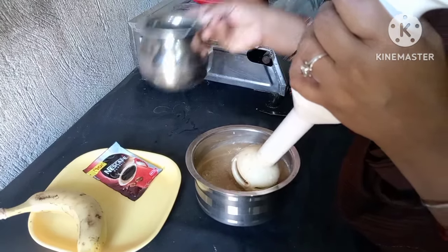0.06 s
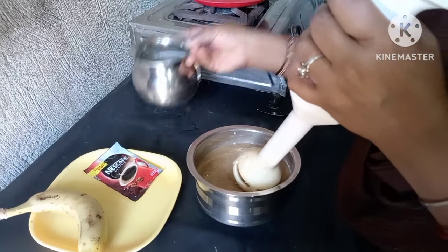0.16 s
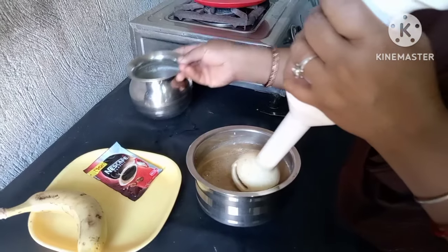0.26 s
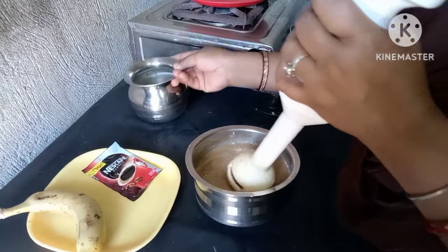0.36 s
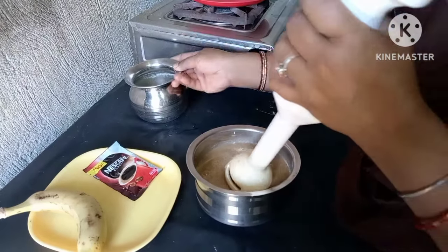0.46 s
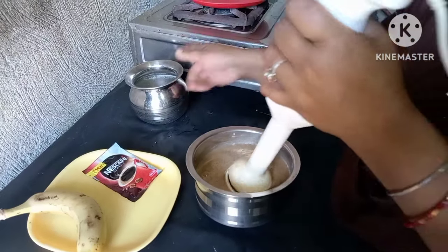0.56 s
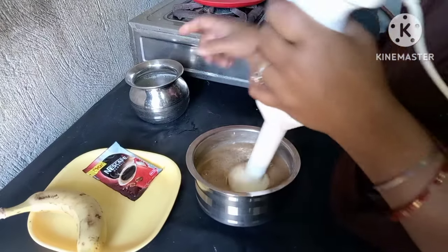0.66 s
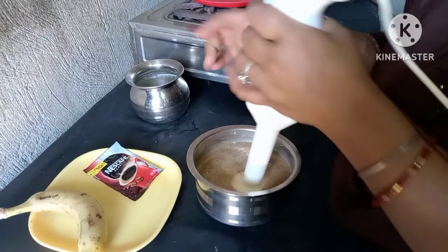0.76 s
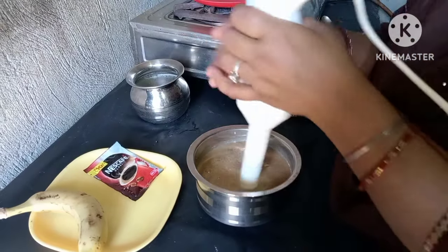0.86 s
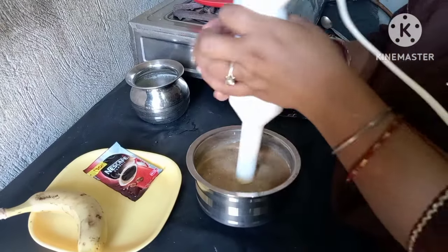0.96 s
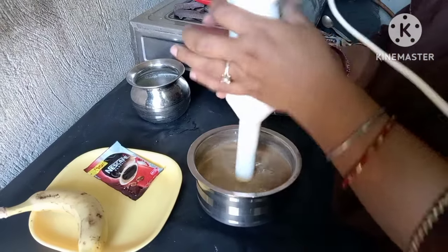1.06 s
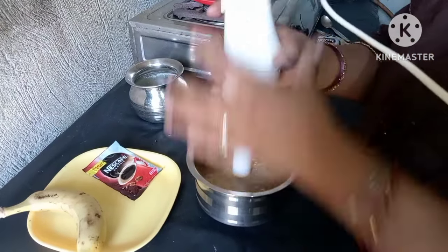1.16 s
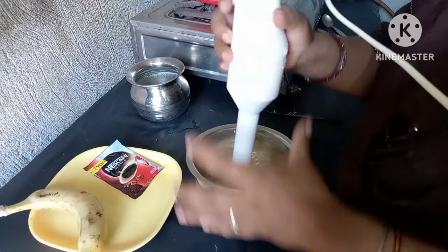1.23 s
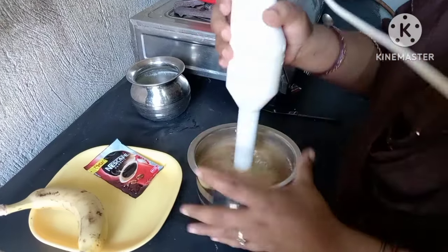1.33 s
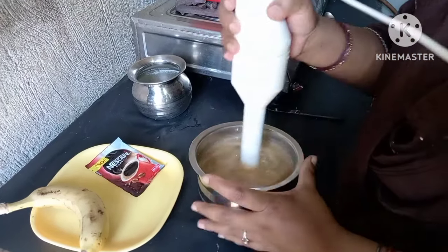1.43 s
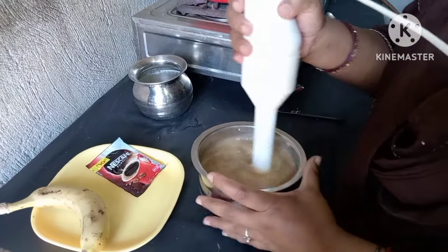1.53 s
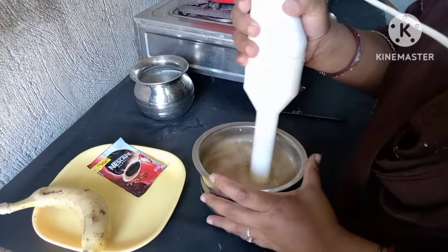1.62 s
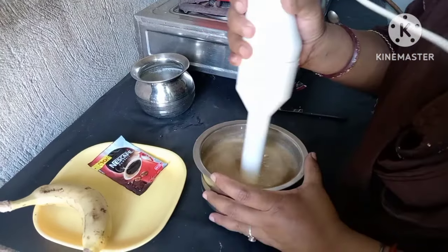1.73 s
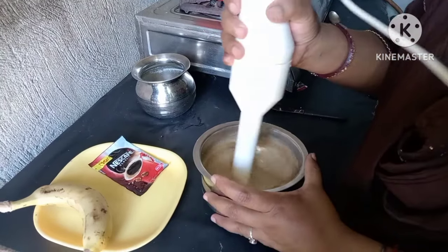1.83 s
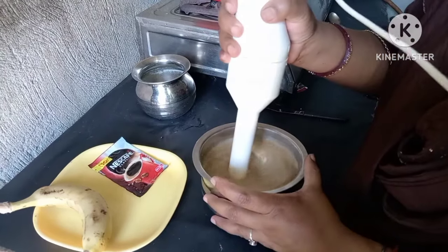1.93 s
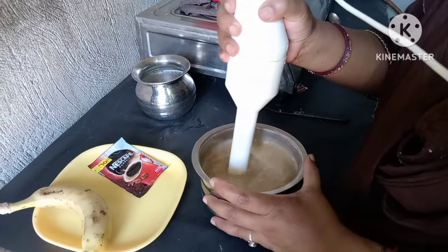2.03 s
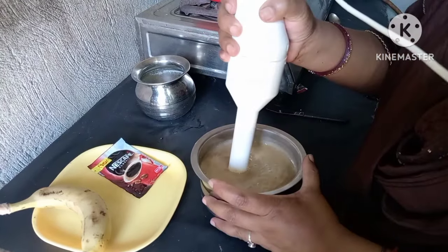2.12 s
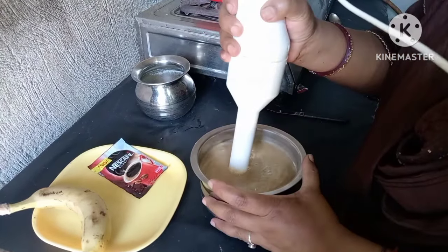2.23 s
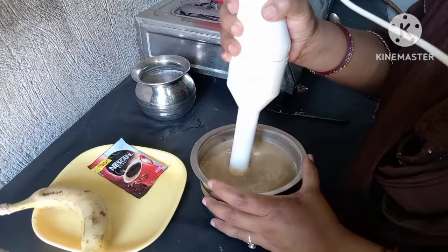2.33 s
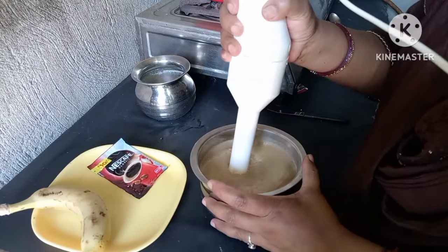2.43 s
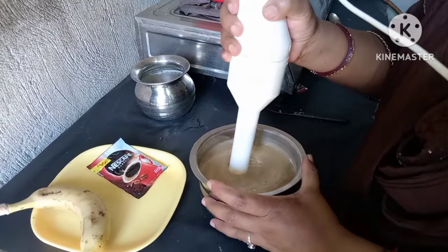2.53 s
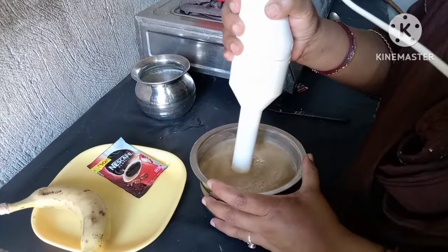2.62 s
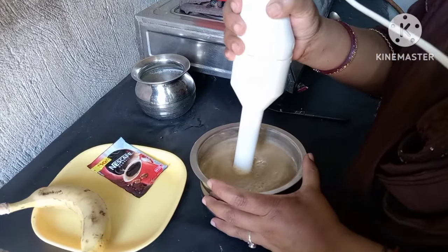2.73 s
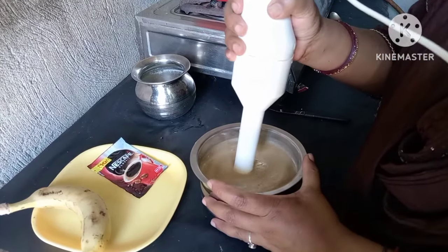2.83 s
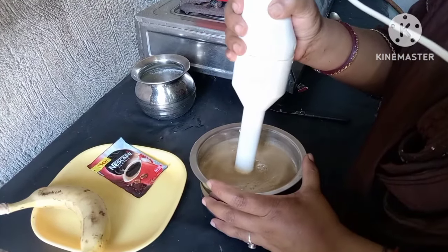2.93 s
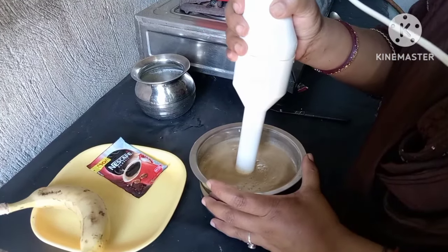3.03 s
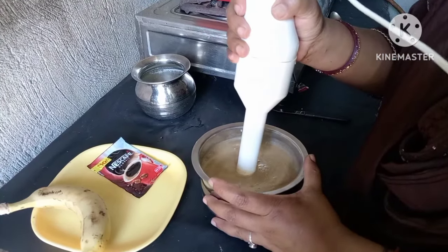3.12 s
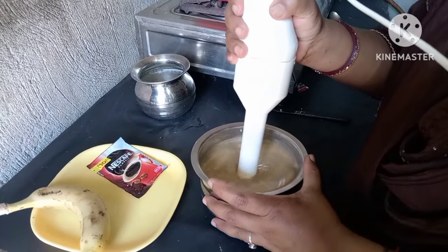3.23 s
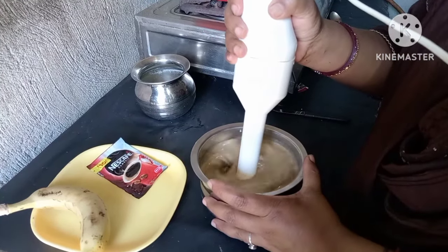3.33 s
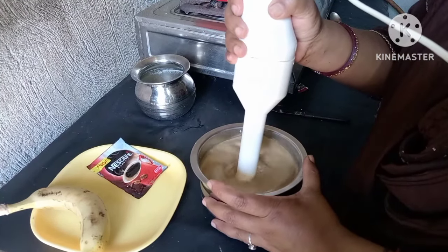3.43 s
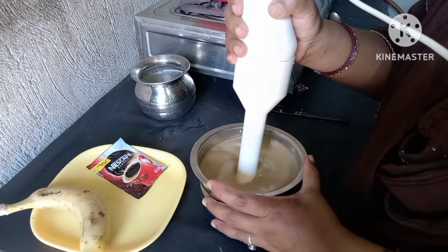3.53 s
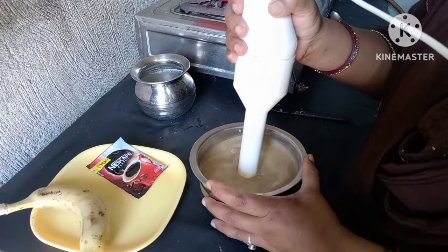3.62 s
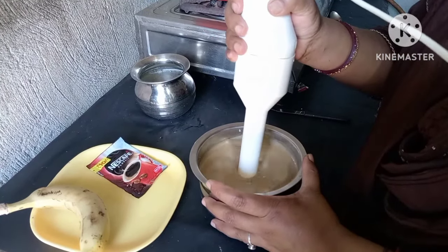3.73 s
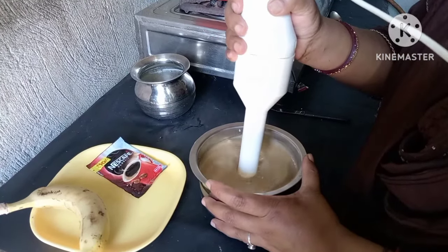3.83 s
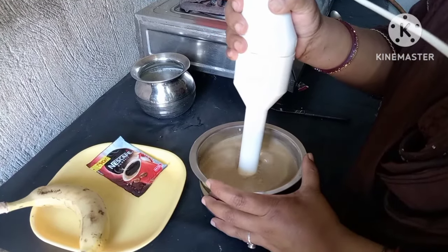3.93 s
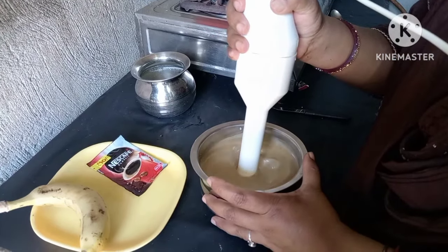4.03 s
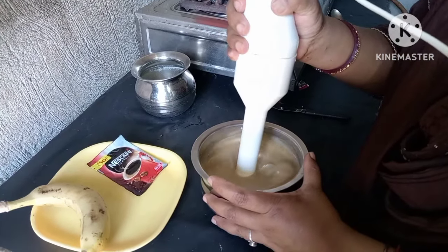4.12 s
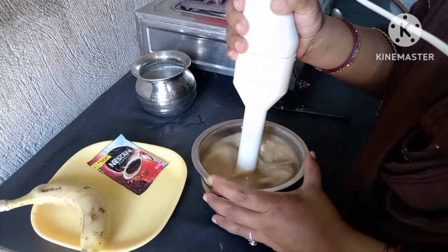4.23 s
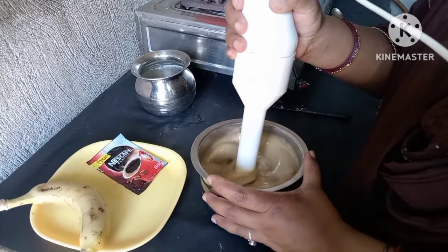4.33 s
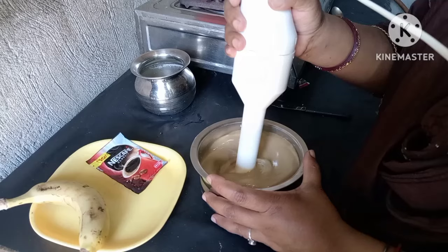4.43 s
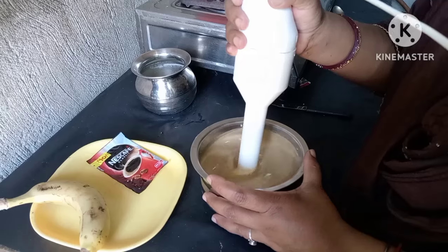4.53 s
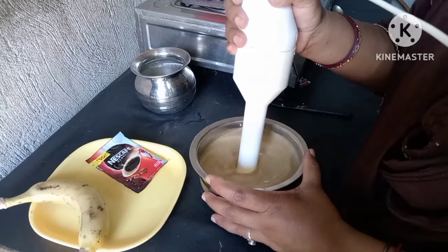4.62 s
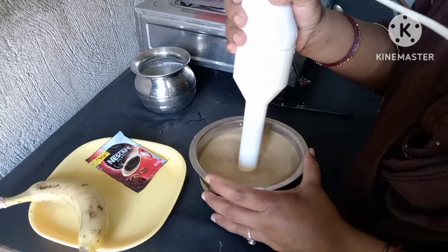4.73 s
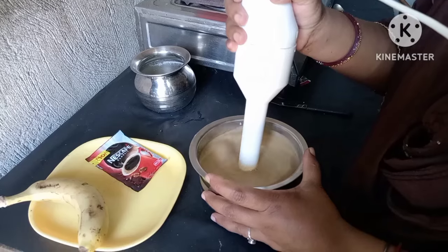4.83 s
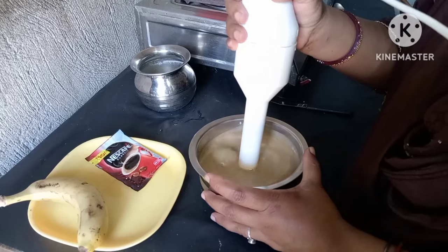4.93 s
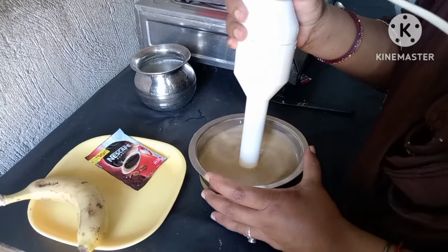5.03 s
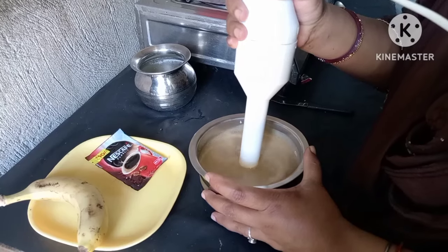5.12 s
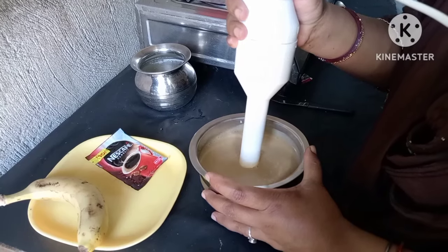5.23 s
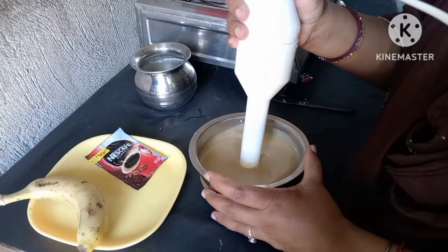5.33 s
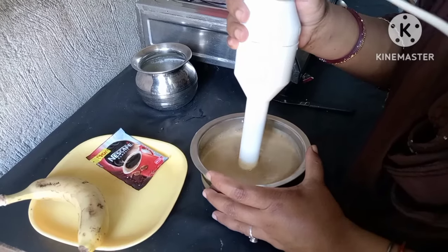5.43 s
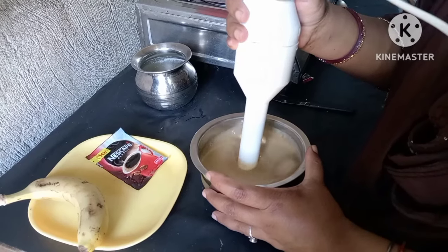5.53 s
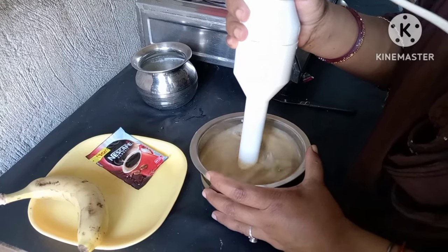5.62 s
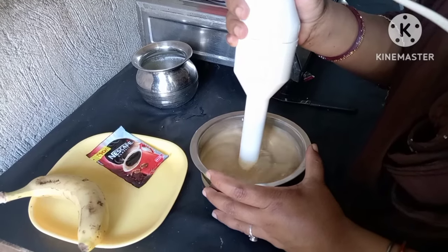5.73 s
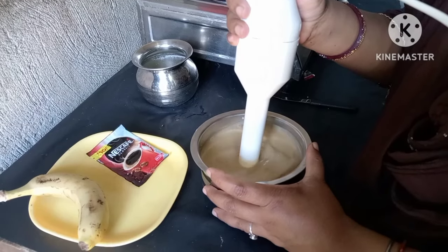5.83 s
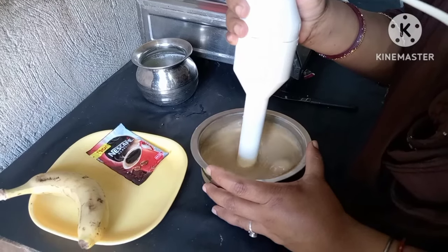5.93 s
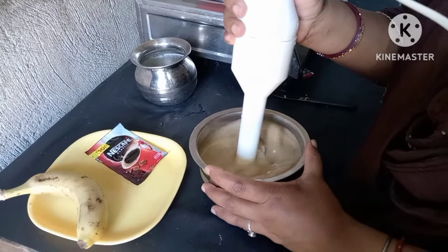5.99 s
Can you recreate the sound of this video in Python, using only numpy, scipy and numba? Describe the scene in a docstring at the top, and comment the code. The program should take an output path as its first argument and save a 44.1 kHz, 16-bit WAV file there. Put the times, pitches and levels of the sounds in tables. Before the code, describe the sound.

In a quiet, low-humming small kitchen, a metal jug is set down and a steel pot knocks and slides on a stone counter. After a near-silent pause, a hand blender fires four brief bursts into milky liquid: a click, a rising whirr, loud wet bubbling churn and a quick run-down. Big bubbles glug softly between the second and third. Close microphone, slightly muffled treble, short hard room tail on the knocks.

```python
"""Over a quiet kitchen hum, the pot and a jug are knocked and slid on a stone counter: decaying tones and noise.
A hand blender then pulses four times in a steel pot of milk and fruit, close to the microphone.
Its churn is made of bursting bubbles, hiss and blade blows; trapped air pockets are ringing, gliding tones.
Big bubbles glug in between, as notes that climb a little. A small hard room adds a short tail to the knocks."""
import sys
import numpy as np
from scipy import signal
from scipy.fft import rfft, irfft, next_fast_len
from scipy.io import wavfile
from scipy.ndimage import uniform_filter1d
from numba import njit

SR = 44100
rng = np.random.default_rng(int(sys.argv[2]) if len(sys.argv) > 2 else 0)


def transcribe(signal):
    """Save signal, clipped to [-1, 1], as a 16-bit WAV file at the path in sys.argv[1]."""
    frames = np.atleast_2d(signal).T
    limited = np.clip(frames, -1, 1)
    pcm = np.round(limited * 32767).astype(np.int16)
    wavfile.write(sys.argv[1], SR, pcm)


N = 267157
T = np.arange(N) / SR  # time of every sample, s


def undb(db):
    """Turn a level in dB into a gain."""
    return 10 ** (np.asarray(db) / 20)


def unit(x):
    """Scale to an rms of 1."""
    return x / np.sqrt(np.mean(x ** 2))


def colour(x, table):
    """Shape the spectrum through (f/Hz, level/dB) points joined on a log-frequency axis."""
    hz, db = np.transpose(table)
    size = next_fast_len(N)
    log_f = np.log(np.arange(size // 2 + 1) * SR / size + 1)
    gain = undb(np.interp(log_f, np.log(hz + 1), db))
    return irfft(rfft(x, size) * gain, size)[..., :N]


def band(x, lo_hz, hi_hz):
    """Keep the sound between two frequencies."""
    return signal.sosfilt(signal.butter(2, [lo_hz, hi_hz], "band", fs=SR, output="sos"), x)


def resonate(x, peaks):
    """Add up resonances, each given as (f/Hz, width/Hz, level/dB)."""
    return sum(undb(db) * signal.lfilter(*signal.iirpeak(hz, hz / width, SR), x) for hz, width, db in peaks)


def walk(rate):
    """Random levels with a spread near 1, each held for 1 / rate seconds and then smoothed twice."""
    hold = int(SR / rate)
    steps = np.repeat(rng.standard_normal(N // hold + 1), hold)
    return 1.3 * uniform_filter1d(uniform_filter1d(steps, hold), hold)[:N]


def add(out, s, x):
    """Mix x into out, starting at time s."""
    i = int(s * SR)
    out[..., i:i + x.shape[-1]] += x[..., :N - i]


def ring(modes, stretch, detune, luck_db=4.5):
    """A struck body as decaying sines with a joint peak of 1; every blow weights and tunes them anew."""
    t = np.arange(SR // 2) / SR
    luck = rng.standard_normal((len(modes), 2))
    x = 0
    for (hz, db, t60), (louder, sharper) in zip(modes, luck):
        sine = np.sin(2 * np.pi * hz * (1 + detune * sharper) * t)
        x = x + undb(db + luck_db * louder) * sine * undb(-60 * t / (t60 * stretch))
    return x / np.abs(x).max()


START_S, BITE_S = .004, 0.017  # time to catch, time to take the load
SPIN_SHAPE = 0.78  # under 1: the level climbs fastest just after the catch
# the first load is loudest, then the vortex settles
SURGE_DB, SURGE_RISE_S, SURGE_S = 5.5, 0.023, 0.08
# splash, spray and rumble against the churn (dB), before each press shifts the first two
FREE_DB, LOADED_DB = (-0.5, -3.5, -17), (-10, -17.5, -20)  # while spinning up, while running
CATCH_DB, CATCH_S = -18, .016  # the treble is weak as the motor catches, and arrives this soon
# after the bite, liquid is thrown up: part way back to the brightness of the spin-up, then calm
THROW_S, THROW_SHARE, SETTLE_S = .028, 0.6, 0.066
OPEN_DB_PER_S = 12  # the treble opens while the blade runs and whips air in
DARKEN_DB = (-1, -6)  # splash and spray fade further once the blade has stalled
STALLED_RUMBLE_DB = 1.5  # the rumble against the churn soon after the stall
# presses of the button: switch on t/s, blade bites t/s, switch off t/s, blade stalls t/s,
# level/dB as the motor catches, just before the bite, and running before the surge;
# fall while coasting and while dying out (dB per s); treble shift/dB spinning up, and running;
# splash, spray and rumble at the stall (level/dB against the churn)
BUTTON_PRESSES = [(3.08, 3.148, 3.253, 3.44, -47, -18, -14.5, -108, -250, -1, -2, -8, -18.5, -14),
                  (3.924, 3.955, 4.327, 4.58, -60, -35.5, -16.5, -108, -350, 1, -1.4, -4.5, -13, -4),
                  (5.312, 5.353, 5.462, 5.62, -50.5, -21, -16, -125, -160, -7, 0, -6.5, -14, -7.5),
                  (5.747, 5.802, 6.086, 6.225, -44, -20, -17, -110, -200, -8.5, -0.61, -4, -18, -8)]


def press(on, bite, off, stall, catch_db, free_db, run_db, coast_db, die_db, up_db, open_db, *stalled_db):
    """One press as four gains (churn, splash, spray, rumble): catch, spin up, bite, run, coast, stall."""
    db = np.interp(T, [on - START_S, on, bite, bite + BITE_S], [-90, catch_db, free_db, run_db])
    spin = np.clip((T - on) / (bite - on), 0, 1)
    db += (free_db - catch_db) * (spin ** SPIN_SHAPE - spin)
    after = np.clip(T - bite, 0, None)
    db += SURGE_DB * (1 - np.exp(-after / SURGE_RISE_S)) * np.exp(-after / SURGE_S)
    db += coast_db * np.clip(T - off, 0, stall - off)
    db += die_db * np.clip(T - stall, 0, None)

    times = [on, on + CATCH_S, bite, bite + BITE_S, bite + THROW_S, bite + SETTLE_S, off, stall, stall + 0.11]
    end_db = (*np.add(stalled_db[:2], DARKEN_DB), STALLED_RUMBLE_DB)
    is_treble = (1, 1, 0)
    parts = []
    for free, loaded, stalled, end, treble in zip(FREE_DB, LOADED_DB, stalled_db, end_db, is_treble):
        free = free + treble * up_db
        loaded = loaded + treble * open_db
        caught = free + treble * CATCH_DB
        bitten = free + free_db - run_db  # undoes the change of the churn level
        thrown = loaded + THROW_SHARE * (free - loaded)
        opened = loaded + treble * OPEN_DB_PER_S * (off - bite)
        levels = [caught, free, free, bitten, thrown, loaded, opened, stalled, end]
        parts.append(np.interp(T, times, levels))
    return undb(db + np.array([0 * T, *parts])) * (T > on - START_S)


@njit
def bubbles(start, hz, cycles, size, glide, n):
    """Each bubble is a sine that dies in a few cycles while its pitch climbs."""
    out = np.zeros(n)
    for k in range(len(start)):
        step = np.exp((2j * np.pi - 3 / cycles[k]) * hz[k] / SR)
        climb = np.exp(2j * np.pi * glide * (hz[k] / SR) ** 2 / cycles[k])
        z = size[k] + 0j
        for i in range(start[k], min(n, start[k] + int(2 * cycles[k] * SR / hz[k]))):
            out[i] += z.imag
            z *= step
            step *= climb
    return out


def froth(per_s, scatter_db):
    """Dense bubbles of all sizes, most bursting at once, some ringing long, over a bed of hiss."""
    u = rng.random((int(per_s * N / SR), 4)).T
    hz = 250 * 30 ** u[1]
    cycles = 2 + 30.0 * u[2] ** 3.0
    size = undb(-scatter_db * np.log(u[3] + 0.0066)) * hz / cycles ** 0.44
    pops = bubbles((u[0] * N).astype(np.int64), hz, cycles, size, .15, N)
    return unit(pops) + undb(7.5) * rng.standard_normal(N)


def chops(per_s, scatter_db):
    """The blade hits fruit and air at uneven moments: short dull blows."""
    u = rng.random((int(per_s * N / SR), 3)).T
    start = np.cumsum(.5 + u[0]) * SR / per_s
    cycles = 3 + 0 * start
    return unit(bubbles(start.astype(np.int64), 550 + 500 * u[1], cycles, undb(scatter_db * u[2]), 0.19, N))


# spectrum of the churning liquid: f/Hz, relative level/dB (per Hz)
CHURN_SPECTRUM = [(150, -45.5), (250, -11.5), (309, -17.5), (341, -6), (377, -9.5), (440, -7.5),
                  (644, -5.5), (831, -6.5), (1150, -7.5), (1460, -10), (2020, -11), (5600, -29),
                  (7320, -44.5), (9520, -69), (16100, -120)]
# resonances of the blender housing: f/Hz, width/Hz, level/dB
HOUSING = [(950, 91, -11), (1270, 120, -8), (2040, 120, -11.5), (2950, 120, -6.5), (3920, 360, -1.5),
           (6030, 720, -2.5)]


def churn():
    """Blade noise: froth, chops, splash, spray and rumble, the parts throbbing on their own."""
    level, splash_gain, spray_gain, rumble_gain = sum(press(*one) for one in BUTTON_PRESSES)
    raw = colour(froth(2500, 1.3), CHURN_SPECTRUM)
    raw = raw + resonate(raw, HOUSING)
    low = colour(raw, [(2000, 0), (3200, -20), (4000, -60)])
    top = colour(raw, [(3000, -60), (3900, -20), (5400, 0)])
    middle = raw - low - top
    splash = splash_gain * unit(middle) * undb(0.59 * walk(30))
    spray = spray_gain * unit(top) * undb(2.4 * walk(33))
    deep = band(band(rng.standard_normal(N), 108, 280), 108, 280)
    rumble = rumble_gain * unit(deep) * undb(1.4 * walk(27))
    body = unit(low) * undb(1.7 * walk(40))
    blows = undb(-9.5) * band(chops(90, 5), 200, 6000)
    return level * (body + blows) + splash + spray + rumble


POCKET_EDGE_DB, POCKET_SHAPE = -19, 1.2  # drop towards start and end; roundness of the swell
# air pockets ringing under the blade: start t/s, peak t/s, end t/s, pitch at the peak f/Hz,
# glide (octaves per s), rms level/dB at the peak before flutter
AIR_POCKETS = [(3.13, 3.17, 3.23, 739, 6, -13.5), (3.19, 3.24, 3.36, 790, -2, -22.5),
               (3.76, 3.83, 3.95, 595, .1, -65), (4.7, 4.75, 4.86, 538, -1, -65.5),
               (3.95, 4.0, 4.04, 920, -4, -23.5), (3.99, 4.06, 4.21, 639, -5.5, -15),
               (3.97, 4.015, 4.06, 290, 2.5, -25.5), (4.06, 4.165, 4.2, 348, 0.9, -18),
               (4.05, 4.125, 4.2, 710, -1.7, -17), (4.18, 4.208, 4.25, 1120, 0.5, -19.5),
               (4.25, 4.3, 4.37, 1090, -2, -21.5), (4.23, 4.31, 4.46, 400, -0.7, -21.5),
               (5.345, 5.39, 5.43, 830, -5, -17), (5.345, 5.37, 5.43, 990, -1, -19),
               (5.35, 5.43, 5.48, 660, -2, -13.5), (5.38, 5.41, 5.49, 495, -2.5, -16.5),
               (5.4, 5.43, 5.48, 300, 0.5, -18), (5.45, 5.495, 5.6, 312, 1.5, -23.5),
               (5.86, 5.915, 5.98, 340, 0.2, -7), (5.79, 5.85, 5.9, 340, 1.5, -21),
               (5.93, 5.99, 6.1, 350, -0.4, -19.5), (5.83, 5.87, 5.9, 1200, -2, -26),
               (5.47, 5.53, 5.6, 400, 0.5, -28.5), (3.15, 3.2, 3.3, 480, -1.5, -25.5),
               (3.13, 3.18, 3.33, 140, 0, -29.5)]


def pockets():
    """Air pockets: tones that glide as the pocket grows or shrinks; the higher ones stutter more."""
    out = np.zeros(N)
    for start, peak, end, hz, glide, db in AIR_POCKETS:
        away = np.interp(T, [start, peak, end], [1, 0, 1])
        pitch = hz * 2 ** (glide * (np.clip(T, start, end) - peak))
        stutter_db = 5.5 * np.clip(pitch / 560, 0, 1) ** 2 * np.clip(walk(130), -1.4, 1.2)
        swell_db = db + POCKET_EDGE_DB * away ** POCKET_SHAPE
        level = undb(swell_db + stutter_db + 2.0 * walk(45)) * (1 - away ** 3)
        wobbling = pitch * (1 + .02 * walk(90))
        out += np.sqrt(2) * level * np.sin(2 * np.pi * np.cumsum(wobbling) / SR)
    return out


# switch click: f/Hz, level/dB before random weighting, time to fall 60 dB t/s
SWITCH_MODES = [(480, 0.5, .06), (620, -7.5, .04), (1800, -8, .04), (2030, -8, .04)]
SWITCH_DB = 15.5  # peak against the level as the motor catches


def button():
    """The switch clicks in the plastic housing at each press: a few short decaying sines."""
    out = np.zeros(N)
    for on, _, _, _, catch_db, *_ in BUTTON_PRESSES:
        add(out, on, undb(catch_db + SWITCH_DB) * ring(SWITCH_MODES, 1, .04, luck_db=2.5))
    return out


# modes of the stone counter: f/Hz, level/dB before random weighting, fall time t/s before stretching
COUNTER_MODES = [(93.5, -11, 0.34), (120.7, -2.5, 0.3), (155.9, 1.5, 0.23), (209, -4, 0.13)]
GLUG_T60_S = .11  # time for a note to fall 60 dB
# big bubbles rising between presses: t/s, note level/dB, starting pitch f/Hz
BIG_BUBBLES = [(4.82, -32.5, 384), (4.831, -32, 396), (4.892, -29.5, 384), (4.908, -29, 395),
               (4.948, -28, 451), (4.96, -33, 489), (4.977, -38, 396), (4.997, -43, 497.8),
               (5.016, -48, 479.5), (5.04, -56, 430)]


def glugs():
    """Large bubbles: a round note that climbs a little, its neighbours in the pot, and a soft thump."""
    out, t = np.zeros(N), np.arange(SR // 3) / SR
    for s, db, hz in BIG_BUBBLES:
        phase = 2 * np.pi * hz * t * (1 + 0.5 * t)
        note = np.sin(phase) + undb(-3.5) * np.sin(0.8982 * phase) + undb(-22) * np.sin(2.05 * phase)
        thump = undb(-6.5) * ring(COUNTER_MODES, 0.6, 0.11)[:len(t)]
        soft_start = 1 - np.exp(-t / .002)
        add(out, s, undb(db) * (note * undb(-60 * t / GLUG_T60_S) + thump) * soft_start)
    return out


# modes of the steel pot, then of its rim: f/Hz, level/dB before random weighting, fall time t/s before stretching
POT_MODES = [(273, -2.5, 0.48), (330, 1, 0.2), (380, -7.5, 0.095), (508, -7, .08), (525, -4.5, 0.012),
             (703, -1, 0.13), (730, 1, 0.039), (767, -3.5, 0.025), (920, 0, 0.08), (1063, 0.5, 0.11),
             (1240, -0.5, 0.096), (1240, -5, 0.2), (1490, -7, 0.05), (1700, -5, 0.046), (1870, -7, 0.052),
             (2040, -2, 0.1), (2160, -2, 0.12)]
RIM_MODES = [(3260, -4.5, 0.14), (3420, -14, 0.04), (3918, 3.5, 0.069), (4400, -9, .2), (5570, 3, .15),
             (5870, 3.5, .06), (6160, -4.5, .15)]
# blows on pot and counter: t/s, body level/dB, thud level/dB and tick level/dB against the body,
# ring time t/s (scaled for each part), clack level/dB against the body, left minus right level/dB
BLOWS = [(0.411, -47.5, -5, 6, 0.17, -7, 2), (0.421, -36.5, 20.5, 5, 0.31, -9, 1.0),
         (0.43, -24, -12, -25, 0.56, -8.5, 0.5), (0.764, -38, -19, -9, 0.16, -6.5, 1),
         (0.859, -48.5, 5, -6, 0.24, 0, 6), (0.889, -21, 3.5, -32, 0.15, -14.5, 2),
         (0.99, -28.5, 10, -45, 0.21, -1, 1.5), (1.211, -24.5, 3, -35, 0.12, -4, -1.5),
         (1.279, -40.5, 3, -19, 0.65, -11, 3), (1.523, -27, 6.5, -42, 0.23, -4.5, 1),
         (1.862, -33.5, 2, -39, 0.16, -8, 2), (2.499, -54.5, 9.5, -20, 0.19, 4, -7),
         (3.962, -16.5, -28, -6.5, 0.16, -4.5, 1), (5.359, -13.5, -28, -4, 0.35, -6, 2)]


def knocks():
    """Each blow and its small bounces ring pot, counter and rim; the tick brings out the upper modes."""
    out, t = np.zeros((2, N)), np.arange(SR // 2) / SR
    for s, db, thud_db, tick_db, t60, clack_db, pan_db in BLOWS:
        chance = rng.standard_normal((4, len(t)))
        bounces = (chance[0] > 2.2) * chance[1] * 0.38 * undb(-60 * t / t60)
        bounces[0] = 1
        body, clack = (signal.fftconvolve(bounces, ring(modes, 0.3, 0.06, luck_db=4))[:len(t)]
                       for modes in (POT_MODES[:8], POT_MODES[8:]))
        # modes too dense to tell apart fill the gaps as a short dull rattle
        rattle = chance[3] * undb(-60 * t / (0.53 * t60))
        body = body / np.abs(body).max() + undb(7) * band(rattle, 250, 790)
        clack = clack / np.abs(clack).max() + band(rattle, 1100, 2200)
        scratch = band(chance[2], 2300, 4400) * undb(-60 * t / (0.22 * t60))
        tick = ring(RIM_MODES, 0.54, 0.038) + scratch
        # the slab takes a few cycles to start moving
        thud = ring(COUNTER_MODES, t60 / 0.3, 0.058, luck_db=2.5) * (1 - np.exp(-t / 0.0039))
        blow = body + undb(clack_db) * clack + undb(thud_db) * thud + undb(tick_db) * tick
        add(out, s, blow * undb(db + np.array([[pan_db], [-pan_db]]) / 2))
    return out


# modes of the jug wall: f/Hz, level/dB before random weighting, fall time t/s before stretching
JUG_MODES = [(4280, 1, .18), (4590, -8, .2), (5160, -5, .2), (5800, -4, 0.19), (6280, -7.5, 0.19),
             (6520, -4, .15)]
JUG_S, JUG_DB = .518, -38.5  # start time, level


def jug():
    """The thin jug wall rings softly after it is set down: high decaying sines with a soft start."""
    out, x = np.zeros(N), ring(JUG_MODES, 0.91, 0.0025, luck_db=2.5)
    soft_start = 1 - np.exp(-np.arange(len(x)) / SR / .012)
    add(out, JUG_S, undb(JUG_DB) * x * soft_start)
    return out


# slides of hands and steel on stone, then a short drip-like click and two soft rustles among the glugs:
# peak t/s, peak level/dB, centre f/Hz, time to rise the last 20 dB t/s, time to fall 60 dB t/s
SLIDES_AND_RUSTLES = [(.42, -39, 4364, 0.0086, 0.27), (.525, -52.5, 3290, .02, .3),
                      (.778, -56.5, 4560, .02, .13), (.895, -49.5, 2230, 0.033, 0.5),
                      (.99, -54.5, 2120, 0.022, 1.1), (1.21, -51, 2200, .01, .55),
                      (1.35, -60.5, 2600, 0.096, .5), (1.53, -55.5, 2200, .01, 0.23),
                      (1.71, -56.5, 2400, 0.044, 0.22), (1.87, -62.5, 2550, .015, 0.37),
                      (2.3, -72, 2503, .15, .8), (2.5, -70, 4000, .02, .3), (2.62, -70.5, 4206, .03, .5),
                      (2.93, -69, 2403, .04, .3), (4.572, -50, 4000, .006, .04),
                      (4.935, -66, 2300, .02, .15), (5.018, -66, 2573, .01, .12)]


def scrape():
    """Slides and rustles: uneven noise leaning towards the loudest one's centre, with steel modes singing along."""
    power = np.array([undb(db - np.where(T < s, 20 * (s - T) / rise, 60 * (T - s) / t60)) ** 2 + 1e-18
                      for s, db, _, rise, t60 in SLIDES_AND_RUSTLES])
    level = np.sqrt(power.sum(axis=0))
    centre = np.log2([row[2] for row in SLIDES_AND_RUSTLES]) @ power / level ** 2  # in octaves
    grains = rng.standard_normal(N) * undb(2.5 * walk(150))
    rustle = 0
    for f in 1500 * 2 ** np.arange(0, 2.1, .33):
        lean = undb(-7 * np.abs(np.log2(f) - centre))
        rustle = rustle + band(grains, f / 1.168, f * 1.055) / np.sqrt(f) * lean
    rims = sum(resonate(grains, [(f, 60, g)]) * undb(4 * walk(12)) for f, g, _ in RIM_MODES + POT_MODES[-1:])
    return level * unit(unit(rustle) + undb(-13.0) * unit(rims))


HUM_DB, UPPER_DB = -60, -1  # background level; extra gain of its upper part
SINK_DB, RETURN_DB_PER_S = -13, 9.5  # it sinks under each burst and creeps back after the stall
# spectrum of the background: f/Hz, relative level/dB (per Hz)
HUM_SPECTRUM = [(15, -59.5), (25, -29.5), (43, -19), (69, -3), (152, 0.5), (403, -7), (433, -8),
                (822, -9.5), (1350, -15), (2400, -19), (5500, -26.5), (7320, -58.5), (9520, -73.5),
                (16100, -120)]
# thin wavering bands: f/Hz, width/Hz, level/dB against the background before wavering
WHINE_BANDS = [(2340, 90, -24.5), (5360, 70, -28.5)]
# swells of the background: centre t/s, half length t/s, bass level/dB, upper part level/dB
HUM_SWELLS = [(0, 0.048, 6, 5), (.42, 0.12, 8, 4), (.9, .35, 0, 3.5), (1.457, 0.4, 6, 3.5),
              (2.399, 0.16, 1.5, -0.5), (3.1, .2, 4, 4), (3.85, 0.077, 4.5, 3.5), (4.93, 0.13, 12, 11.5),
              (5.274, 0.068, 1, -0.5)]


def hum():
    """Kitchen background: shaped noise with a smooth upper part, a bass that wavers more, and thin whines."""
    bass_db, upper_db = sum(np.outer(db, np.exp(-((T - s) / half) ** 2)) for s, half, *db in HUM_SWELLS)
    sinks = []
    for _, bite, _, stall, *_ in BUTTON_PRESSES:
        depth_db = np.clip(SINK_DB + RETURN_DB_PER_S * np.clip(T - stall, 0, None), None, 0)
        sinks.append(depth_db * np.clip((T - bite) / .1, 0, 1))
    sink_db = np.min(sinks, axis=0)
    raw = unit(colour(rng.standard_normal(N), HUM_SPECTRUM))
    bass = colour(raw, [(500, 0), (1500, -30)])
    upper = raw - bass
    out = bass * undb(2.0 * walk(16) + bass_db)
    out += upper * undb(1.3 * walk(20) + UPPER_DB + upper_db)
    for hz, width, db in WHINE_BANDS:
        out += undb(db + 4.0 * walk(11)) * unit(resonate(raw, [(hz, width, 0)]))
    return out * undb(HUM_DB + sink_db)


ROOM_T60_S, ROOM_DB = 0.28, -1.5  # time to fall 60 dB; tail level against the direct sound


def room(x):
    """Diffuse tail of tiled walls as fading noise; above the bass it differs between the channels."""
    t = np.arange(SR // 2) / SR
    same, other = rng.standard_normal((2, len(t))) * undb(-60 * t / ROOM_T60_S) * (t > .006)
    tail = same + band(other, 600, 9000) * np.array([[1], [-1]])
    tail /= np.sqrt(np.sum(tail ** 2, axis=1, keepdims=True))
    return x + undb(ROOM_DB) * signal.fftconvolve(x, tail, axes=1)[:, :N]


# stereo width: f/Hz, side minus mid level/dB
STEREO_WIDTH = [(60, -17), (100, -17.5), (170, -17), (290, -16.5), (490, -8.5), (840, -6), (1410, -0.5),
                (2400, -2.5), (4060, -1), (6870, 2.5)]
# stereo balance: f/Hz, left minus right level/dB
STEREO_LEAN = [(60, 4), (100, -1), (170, 1.5), (290, -1), (490, -1), (840, 1.5), (1410, -2), (2400, -4.5),
               (4060, -4.5), (6870, -4)]


def wide(mid, other, lead=0.45):
    """Two channels: alike in the bass; in the treble partly unrelated, partly alike with the left leading."""
    lead = np.clip(lead, 0, 1)
    shifted = signal.hilbert(mid, next_fast_len(N))[:N].imag  # a quarter cycle behind
    side = colour(np.sqrt(1 - lead ** 2) * other - lead * shifted, STEREO_WIDTH)
    hz, db = np.transpose(STEREO_LEAN)
    return np.array([colour(mid + side, np.c_[hz, db / 2]), colour(mid - side, np.c_[hz, -db / 2])])


def scene():
    """Blade noise, bubbles, scraping and hum close by, plus the blows in the room."""
    close = churn() + pockets() + glugs() + button() + scrape() + hum()
    other = churn() + scrape() + hum()
    return wide(close, other) + room(knocks() + jug())


MIC_HZ, TOP_HZ = 7477, 15480  # where the treble falls away, where it ends
# spectrum of the circuit hiss: f/Hz, relative level/dB (per Hz)
HISS_SPECTRUM = [(20, 19.5), (100, 8.5), (7000, 3.5), (9000, 1), (12000, -0.5)]
HISS_DB = -79  # rms level


def record(dry):
    """The microphone drops the deep bass and rounds the peaks; the treble falls away over a faint hiss."""
    x = signal.sosfilt(signal.butter(3, 82, "high", fs=SR, output="sos"), dry)
    x = signal.lfilter(*signal.butter(3, 6600, fs=SR), np.tanh(0.79 * x) / 0.94)
    x = signal.sosfilt(signal.ellip(6, .5, 26, MIC_HZ, fs=SR, output="sos"), x)
    hiss = undb(HISS_DB) * unit(colour(rng.standard_normal(x.shape), HISS_SPECTRUM))
    # the output stage bends the loudest peaks once more, which spills a little above the fall
    x = x - 0.09 * x ** 3 + hiss
    return signal.sosfilt(signal.ellip(8, .2, 70, TOP_HZ, fs=SR, output="sos"), x)


dry = scene()
out = record(dry)
transcribe(out)
```